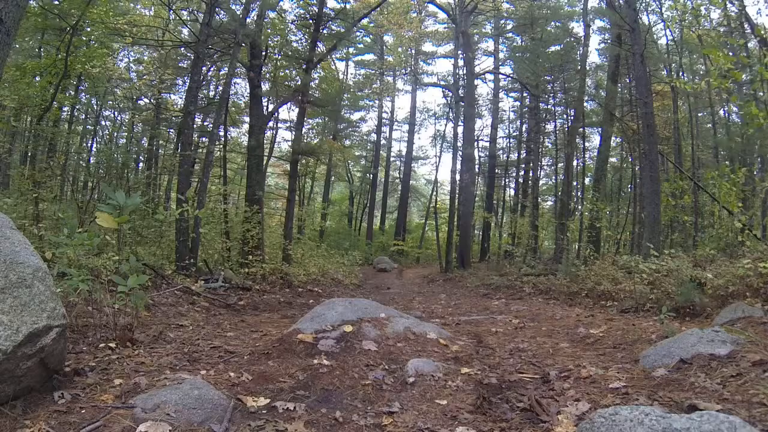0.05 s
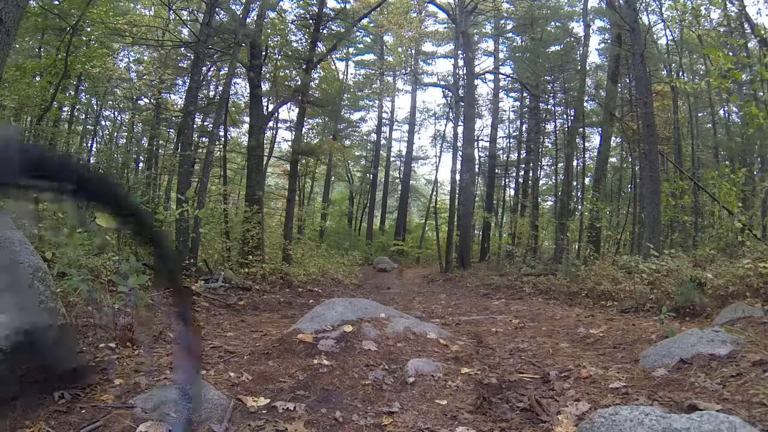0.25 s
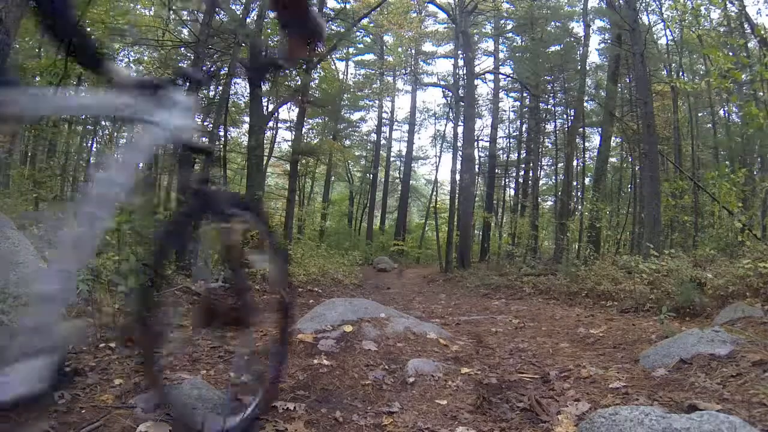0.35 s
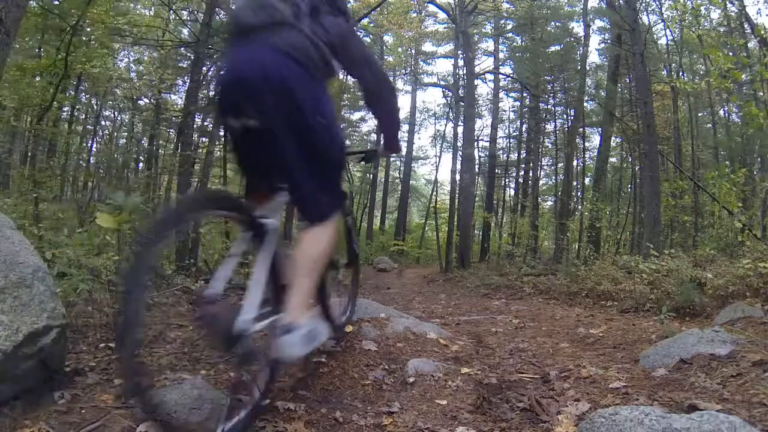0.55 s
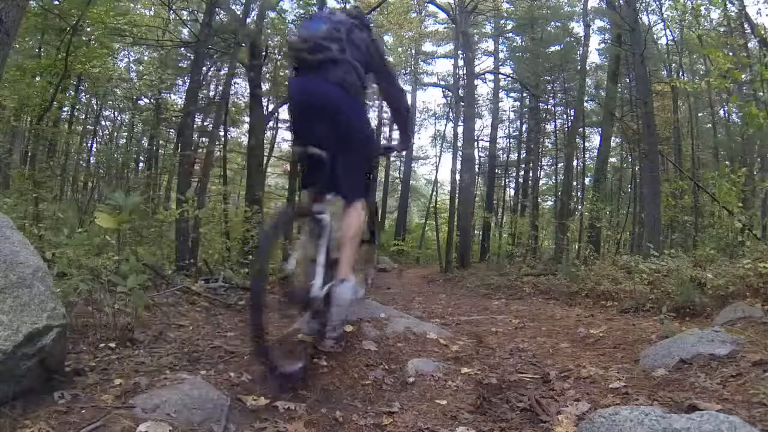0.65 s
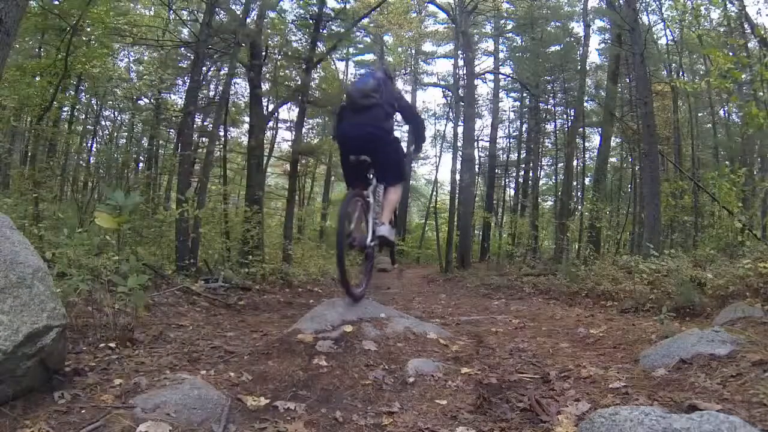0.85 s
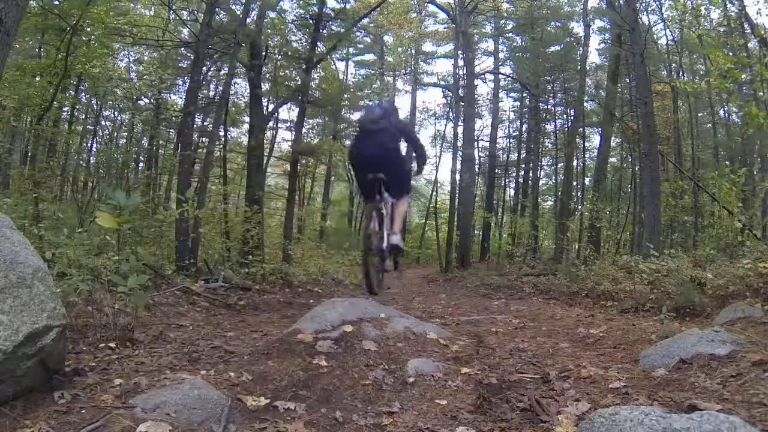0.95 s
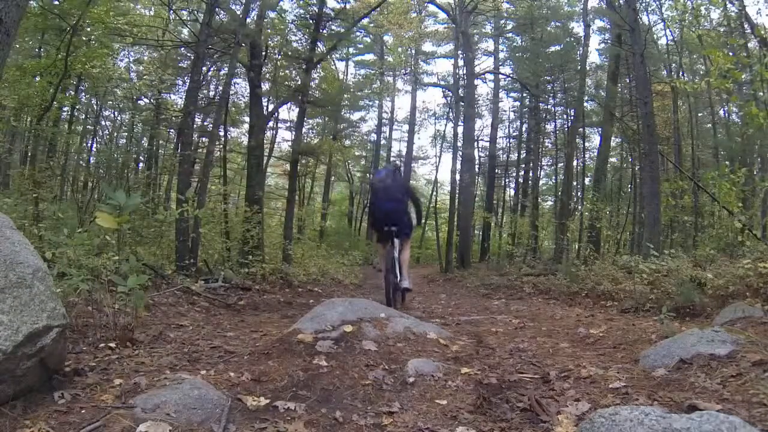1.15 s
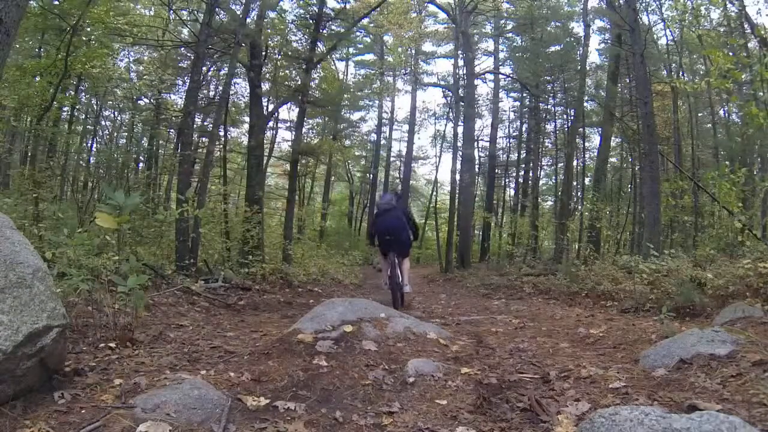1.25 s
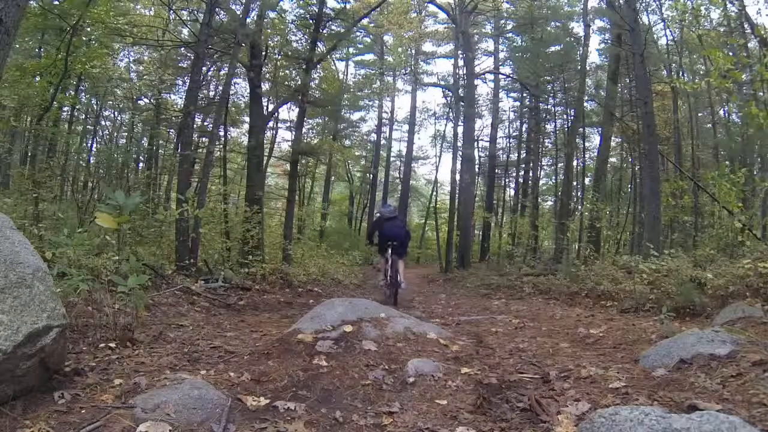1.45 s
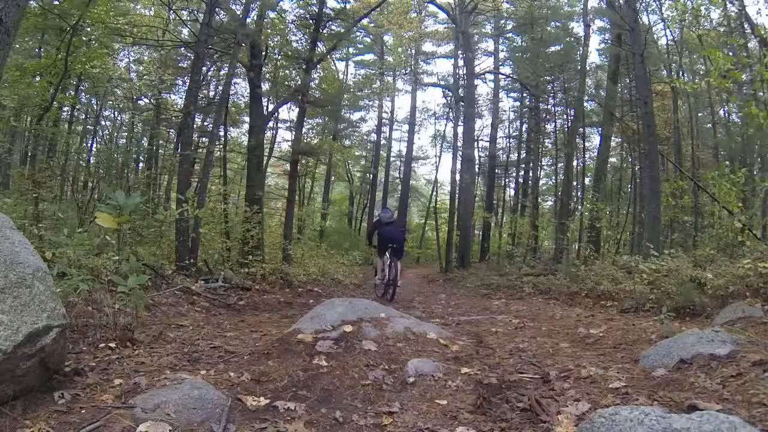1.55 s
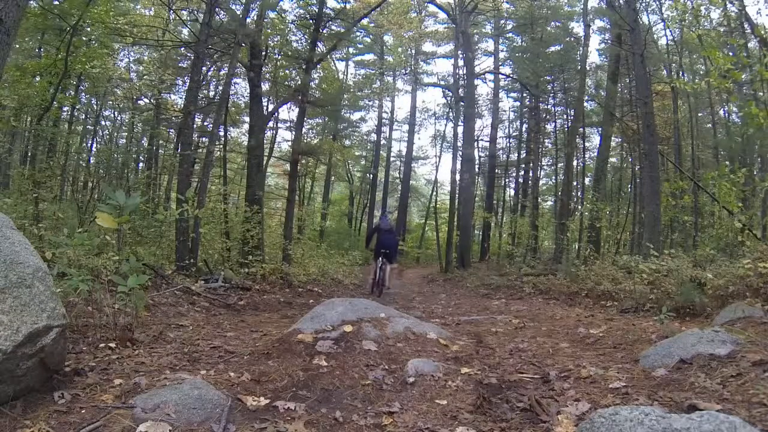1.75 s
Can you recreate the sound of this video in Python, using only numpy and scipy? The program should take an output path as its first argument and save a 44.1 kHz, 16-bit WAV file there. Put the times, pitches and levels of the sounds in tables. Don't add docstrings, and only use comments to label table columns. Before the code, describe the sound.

Mountain bike rolls close by over gritty ground, freewheel ticking, then lands with thud and metallic clink

```python
import sys
import numpy as np
from scipy import signal
from scipy.fft import rfft, irfft
from scipy.io import wavfile
from scipy.ndimage import uniform_filter1d

SR = 44100
rng = np.random.default_rng(int(sys.argv[2]) if len(sys.argv) > 2 else 0)


def volts_from_decibels(level):
    exponent = np.asarray(level, float) / 20
    return 10 ** exponent


def waveform_to_disk(signal):
    frames = np.transpose(np.atleast_2d(signal))
    scaled = np.clip(frames, -1, 1) * 32767
    samples = np.round(scaled).astype(np.int16)
    wavfile.write(sys.argv[1], SR, samples)


N = 79380

# frequency in Hz, level in dB.
AIR_SPECTRUM = [(18, -10), (90, 4), (330, -6.5), (1000, -12.5), (2200, -16.5), (5000, -21.5),
                (10500, -29.5), (15200, -35)]
# frequency in Hz, width in Hz, level in dB.
INSECT_HAZE = [(10050, 400, -83), (3100, 770, -81), (1460, 310, -78)]
# frequency in Hz, rms level in dB.
WHINE_TONES = [(10429, -93), (12646, -99), (5432, -96)]
# time in seconds, then grit, gravel and leaf levels in dB.
TYRE_LEVELS = [(.07, -66, -68, -83), (.15, -59, -66, -71), (.19, -61.5, -67, -76), (.25, -59.5, -65.5, -80),
               (.3, -60.5, -65.5, -81.5), (.35, -59.5, -68, -68.5), (.42, -63, -66, -80),
               (.48, -58.5, -66.5, -78), (.53, -62.5, -67.5, -74), (.6, -58.5, -67, -76),
               (.665, -65.5, -69, -76), (.71, -65, -71, -72), (.8, -69.5, -74.5, -84),
               (1.15, -90, -77.5, -83), (1.22, -68.5, -72.5, -81), (1.4, -80, -76.5, -79.5),
               (1.53, -76, -79, -92), (1.8, -97, -82, -99)]
# frequency in Hz, density in dB per Hz.
GRAVEL_SPECTRUM = [(150, 11), (500, -5.5), (1000, -17), (2000, -2), (3000, 9), (3700, 0), (6000, -17),
                   (12000, -31.5)]
# frequency in Hz, density in dB per Hz.
LEAF_SPECTRUM = [(3000, -9), (5000, 0.5), (7500, -4.5), (11000, -3), (13000, -3), (15000, -17.5)]
# frequency in Hz, width in Hz, level in dB.
HOUSING_MODES = [(1351.7, 210, 1), (1565, 286, -3)]
# time in seconds, level in dB.
SWAY_LEVELS = [
    (.07, -63),
    (.42, -62.5),
    (.52, -50.5),
    (.62, -42),
    (.75, -39.5),
    (1.0, -39),
    (1.3, -45),
    (1.55, -61),
    (1.8, -59.5),
]
# time in seconds, level in dB.
SHAKE_LEVELS = [(.09, -67.5), (.2, -59), (.32, -57), (.41, -63), (.49, -58.5), (.54, -62), (.62, -56.5),
                (.7, -56.5), (.86, -59), (1.1, -70.5), (1.25, -56.5), (1.5, -64), (1.8, -76)]
# start in seconds, peak in dB, relative top end in dB, length in seconds.
CRACK_EVENTS = [(.152, -58, -12, .001), (.173, -56, -14, .001), (.1955, -54, -10, .0015),
                (.204, -50, -16, .0006), (.2086, -43, -5, 0.00048), (.2098, -49.5, -8, .0008),
                (.241, -57, -14, .001), (.2705, -58, -14, .001), (.280, -54, -14, .001),
                (.2873, -54, -12, .001), (.2903, -55, -12, .0015), (.304, -58, -3, 0.0022),
                (.3826, -48, -11, 0.00095), (.407, -53, -16, .001), (.4147, -54, -17, .0012),
                (.4717, -55, -14, .001), (.482, -54.5, -9, .0012), (.488, -59, -14, .001),
                (.4945, -59, -17, .001), (.5465, -58, -4, 0.0022), (.560, -57, -12, .003),
                (.581, -61, 0, .001), (.599, -57, -12, .003), (.616, -59, -12, .002),
                (1.2303, -57.5, -10, .003)]
# start in seconds, peak in dB, pitch in Hz, length in seconds.
RATTLE_EVENTS = [(0.2079, -39.7, 1436, 0.0057), (0.2273, -53, 1390, 0.0029), (0.2664, -48, 1460.0, 0.0047),
                 (0.2812, -48.8, 1460.0, 0.0035), (0.289, -47, 1450, 0.0046),
                 (0.294, -46.8, 1470.0, 0.0029), (0.3005, -51.2, 1470, 0.0038), (0.319, -48, 1396, 0.0068),
                 (0.3408, -50.4, 1410.0, 0.0042), (0.3419, -49.6, 1383, 0.01),
                 (0.3521, -50.3, 1370.0, 0.0028), (0.3594, -51.8, 1460, 0.0052),
                 (0.3625, -52.1, 1370.0, 0.003), (0.3713, -49.3, 1430.0, 0.0029),
                 (0.3744, -54, 1480.0, 0.0027), (0.3821, -41, 1390.0, 0.005), (0.3867, -46.5, 1410, 0.0025),
                 (0.4, -49, 1440.0, 0.004), (0.416, -51.5, 1470, 0.0037), (0.4329, -51.8, 1460.0, 0.0035),
                 (0.4712, -49, 1380, 0.0023), (0.4757, -47, 1370.0, 0.0053),
                 (0.4813, -46.5, 1460.0, 0.0051), (0.489, -51.1, 1490, 0.0042),
                 (0.5219, -48.5, 1460, 0.002), (0.524, -49, 1410.0, 0.0051), (0.5605, -44.5, 1450, 0.0029),
                 (0.5674, -52.3, 1360.0, 0.003), (0.5717, -46.5, 1460.0, 0.0046),
                 (0.5758, -49, 1520, 0.0022), (0.5929, -44.5, 1375, 0.0056), (0.599, -43.5, 1406, 0.0091),
                 (0.6158, -45.5, 1440, 0.0064), (0.6292, -52.5, 1420, 0.0116), (0.6552, -52, 1380, 0.0048),
                 (1.1942, -57, 1470.0, 0.0035), (1.199, -60, 1620.0, 0.0016), (1.2, -56, 1510, 0.0105),
                 (1.21, -59.3, 1620.0, 0.0019), (1.228, -57, 1410, 0.011), (1.2378, -60.0, 1440.0, 0.0017),
                 (1.2413, -61, 1350.0, 0.0034), (1.2678, -63, 1490.0, 0.0028),
                 (1.285, -61.6, 1420.0, 0.0022), (1.2887, -62, 1440, 0.0045), (1.2959, -61, 1460.0, 0.0041),
                 (1.325, -61.6, 1570.0, 0.0041), (1.3306, -57, 1405, 0.0055)]
# start in seconds, peak in dB, length in seconds.
THUMP_EVENTS = [(.267, -60, 0.0044), (.346, -55, .003), (0.359, -53.5, .003), (.372, -54, .003),
                (.476, -54.5, .004), (.560, -49, 0.0036), (.564, -46.5, 0.0062), (.576, -54, .003),
                (.595, -50, 0.0059), (.601, -50, 0.0087), (.625, -53, 0.007), (.638, -54, .004),
                (.652, -57, .006), (1.239, -57, 0.013), (1.279, -57.5, 0.005), (1.468, -57, .005)]
# start in seconds, level in dB, second ring in Hz.
PAWL_TICKS = [
    (0.2684, -67, 10110),
    (0.2938, -70, 8000),
    (0.3243, -64, 10200),
    (0.3477, -68, 11200),
    (0.3742, -62, 10100),
    (0.4011, -56, 9900),
    (0.429, -67, 9860),
    (0.4545, -59, 11980),
    (0.4809, -61, 8500),
    (0.5104, -61, 6990),
]
PAWL_PITCHES = (13800, 14440)
# frequency in Hz, rms level in dB, length in seconds, arrival in seconds.
SOIL_THUDS = [
    (42, -50, 0.049, .486),
    (62.3, -52.5, 0.057, .574),
    (61, -49.5, 0.034, .632),
    (60, -45.5, 0.11, 1.2075),
    (62, -48.5, 0.14, 1.300),
    (63.9, -58.5, 0.21, 1.4397),
]
# start in seconds, level in dB.
ROCK_CONTACTS = [
    (1.1908, -56.5),
    (1.1921, -50),
    (1.1943, -50),
    (1.1963, -59),
]
# frequency in Hz, level in dB, 60 dB decay in seconds.
FRAME_MODES = [(2950, -6, .018), (3320, -2, .02), (3980, 2, .02), (4550, -4, .01), (5400, -4, .022),
               (6010, 1, .016), (7100, -9, .01), (8200, -11, .035), (10300, -17, .01), (11900, -17, .01),
               (13200, -13, .01), (14500, -15, .01)]
# frequency in Hz, level in dB, 60 dB decay in seconds.
SPOKE_MODES = [(6720, -67.5, .8), (6770, -64, .25), (8230, -74, .3), (5410, -67, .09), (3320, -67, .07)]

GRIT_PER_S, GRIT_SPREAD_DB = 3000, 2.5


def evened(x):
    return x / np.sqrt(np.mean(x ** 2) + 1e-20)


def curve(table, column):
    rows = np.array(table)
    return volts_from_decibels(np.interp(np.arange(N) / SR, rows[:, 0], rows[:, column]))


def add(mix, s, sound):
    part = mix[round(s * SR):][:len(sound)]
    part += sound[:len(part)]


def resonate(x, hz, width):
    return signal.lfilter(*signal.iirpeak(hz, hz / width, SR), x)


def coloured(x, points):
    hz, db = np.transpose(points)
    log_hz = np.log(np.fft.rfftfreq(N, 1 / SR) + 1)
    gain = volts_from_decibels(np.interp(log_hz, np.log(hz), db, left=-60))
    return evened(irfft(rfft(x) * gain, N))


def band(x, lo_hz, hi_hz):
    return signal.sosfilt(signal.butter(2, [lo_hz, hi_hz], "band", fs=SR, output="sos"), x)


def decaying(t, db, t60):
    return volts_from_decibels(db - 60 * t / t60)


def grains(per_s, spread_db):
    clump = volts_from_decibels(1.8 * evened(uniform_filter1d(rng.standard_normal(N), size=300)))
    click = rng.standard_normal(N)
    size = volts_from_decibels(spread_db * np.minimum(rng.exponential(1, N), 3))
    struck = rng.random(N) < per_s / SR
    return clump * click * size * struck


def forest():
    t = np.arange(N) / SR
    out = volts_from_decibels(-63) * coloured(rng.standard_normal(N), AIR_SPECTRUM)
    for hz, width, db in INSECT_HAZE:
        haze = resonate(resonate(rng.standard_normal(N), hz, width), hz, width)
        out += volts_from_decibels(db) * evened(haze)
    for hz, db in WHINE_TONES:
        out += np.sqrt(2) * volts_from_decibels(db) * np.sin(2 * np.pi * hz * t)
    return out


def housing(x):
    out = np.zeros(len(x))
    for k, (hz, width, db) in enumerate(HOUSING_MODES):
        out += (-1) ** k * volts_from_decibels(db) * resonate(resonate(x, hz, width), hz, 1200)
    return out


def tyres():
    grit = volts_from_decibels(-2.5) * evened(housing(grains(3 * GRIT_PER_S, .5 * GRIT_SPREAD_DB)))
    roll = volts_from_decibels(-12.5) * evened(band(grains(GRIT_PER_S, GRIT_SPREAD_DB), 120, 407))
    gravel = coloured(grains(2 * GRIT_PER_S, GRIT_SPREAD_DB), GRAVEL_SPECTRUM)
    leaves = coloured(grains(3 * GRIT_PER_S, GRIT_SPREAD_DB), LEAF_SPECTRUM)
    out = curve(TYRE_LEVELS, column=1) * (grit + roll)
    out += curve(TYRE_LEVELS, column=2) * gravel
    return out + curve(TYRE_LEVELS, column=3) * leaves


def mount_sway():
    sway_hz, crest_s = 17.2, .925
    t = np.arange(N) / SR
    return np.sqrt(2) * curve(SWAY_LEVELS, column=1) * np.cos(2 * np.pi * sway_hz * (t - crest_s))


def soil_rumble():
    shake = band(band(rng.standard_normal(N), 28, 76.0), 24, 75.5)
    return curve(SHAKE_LEVELS, column=1) * evened(shake)


def cracks():
    out, t = np.zeros(N), np.arange(1500) / SR
    for s, db, top_db, length in CRACK_EVENTS:
        snap = rng.standard_normal(1500) * np.exp(-t / np.clip(length, .0002, .01))
        body = band(band(snap, 2200, 3700), 1900, 4500)
        top = band(band(snap, 4200, 9000), 3500, 10500)
        add(out, s, volts_from_decibels(db + 1.5) * (body / abs(body).max() + volts_from_decibels(top_db) * top / abs(top).max()))
    return out


def rattles():
    out, t = np.zeros(N), np.arange(1500) / SR
    for s, db, hz, length in RATTLE_EVENTS:
        noise = rng.standard_normal(1500)
        swell = np.sin(np.pi * np.minimum(t / length, 1) ** .7)
        rough = .25 * evened(band(noise, 1150, 1900))
        ring = np.sin(2 * np.pi * (hz * t + noise[0]))
        add(out, s, volts_from_decibels(db - 1) * swell * (ring + rough))
    return out


def thumps():
    out, t = np.zeros(N), np.arange(1500) / SR
    for s, db, length in THUMP_EVENTS:
        blow = rng.standard_normal(1500) * np.exp(-t / np.clip(length, .001, .015))
        dull, edge = band(blow, 190, 560), band(blow, 560, 1200)
        add(out, s, volts_from_decibels(db) * (dull / abs(dull).max() + volts_from_decibels(-4) * edge / abs(edge).max()))
    return out


def freewheel():
    out, t = np.zeros(N), np.arange(900) / SR
    for s, db, hz in PAWL_TICKS:
        ring = sum(np.sin(2 * np.pi * f * t) for f in PAWL_PITCHES) / 2
        ring += volts_from_decibels(-6) * np.sin(2 * np.pi * hz * t)
        add(out, s, decaying(t, db, .011) * np.minimum(t / 0.00031, 1) * ring)
    return out


def soil_thuds():
    out, t = np.zeros(N), np.arange(N) / SR
    for hz, db, length, s in SOIL_THUDS:
        swell = np.sin(np.pi * np.minimum(t / length, 1) ** .65)
        add(out, s, np.sqrt(2) * volts_from_decibels(db) * swell * np.sin(2 * np.pi * hz * t))
    return out


def frame_clink():
    out, t = np.zeros(N), np.arange(SR // 2) / SR
    phases = rng.random((len(ROCK_CONTACTS), len(FRAME_MODES)))
    for (s, db), turns in zip(ROCK_CONTACTS, phases):
        burst = rng.standard_normal(len(t)) * np.exp(-t / .0012)
        sound = volts_from_decibels(2) * band(band(burst, 2840, 6150), 2450, 15000)
        for (hz, mode_db, t60), turn in zip(FRAME_MODES, turns):
            sound += decaying(t, mode_db, t60) * np.sin(2 * np.pi * (hz * t + turn))
        add(out, s, volts_from_decibels(db) * np.minimum(t / 0.00036, 1) * sound)
    return out


def tree_echo():
    out, t = np.zeros(N), np.arange(SR // 2) / SR
    tail = evened(band(rng.standard_normal(len(t)), 2800, 7600))
    add(out, ROCK_CONTACTS[1][0], decaying(t, -62.5, .42) * tail)
    return out


def spoke():
    out, t = np.zeros(N), np.arange(SR // 2) / SR
    for k, (hz, db, t60) in enumerate(SPOKE_MODES):
        wobble_db = 2.5 * evened(uniform_filter1d(rng.standard_normal(len(t)), size=300))
        level = decaying(t, db + wobble_db, t60) * np.minimum(t / .003, 1)
        add(out, 1.1985, (-1) ** k * level * np.sin(2 * np.pi * hz * t))
    return out


def scene():
    out = forest() + tyres()
    out += cracks() + thumps() + rattles() + freewheel()
    out += frame_clink() + spoke() + tree_echo()
    out += mount_sway() + soil_rumble() + soil_thuds()
    return out[None]


def band_limit(x):
    return signal.sosfilt(signal.butter(12, 15250, fs=SR, output="sos"), x)


def record(dry):
    start_s, edge_hz = 0.073, 15250
    opening = np.clip((np.arange(N) / SR - start_s) / 0.00017, 0, 1)
    lowpass = signal.firwin(511, edge_hz, window=("kaiser", 9), fs=SR)
    mix = signal.oaconvolve(dry * opening, lowpass[None], "same")
    return band_limit(mix)


dry = scene()
out = record(dry)
waveform_to_disk(out)
```